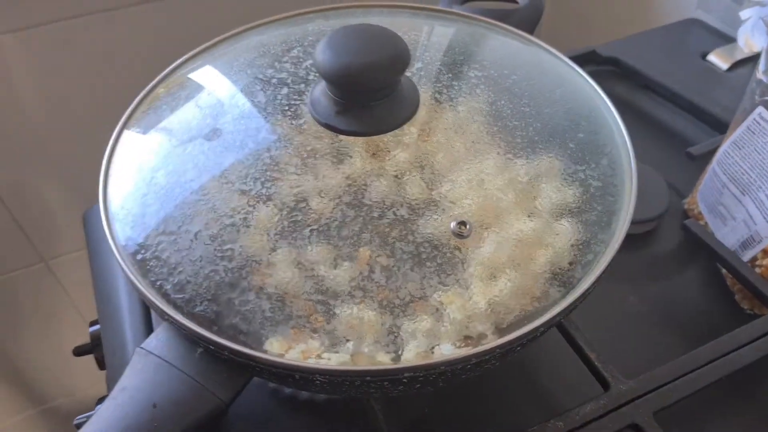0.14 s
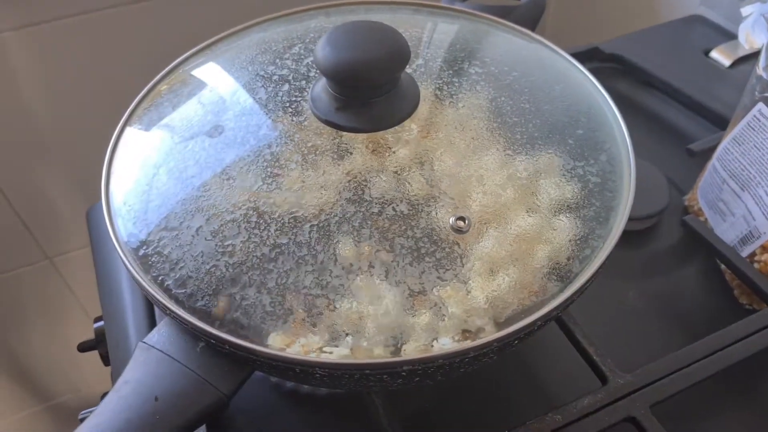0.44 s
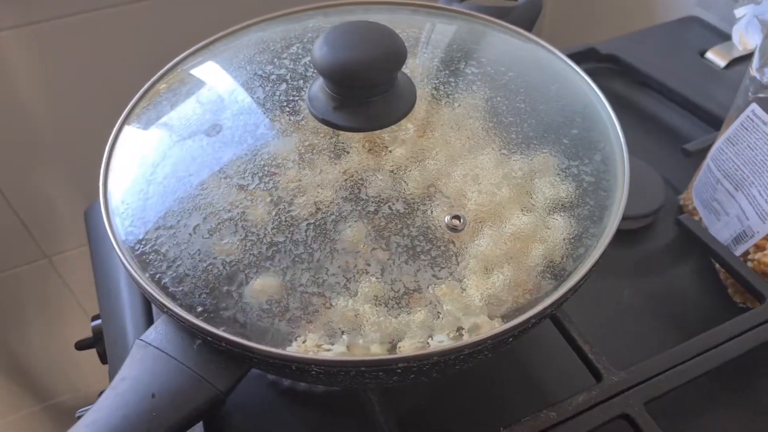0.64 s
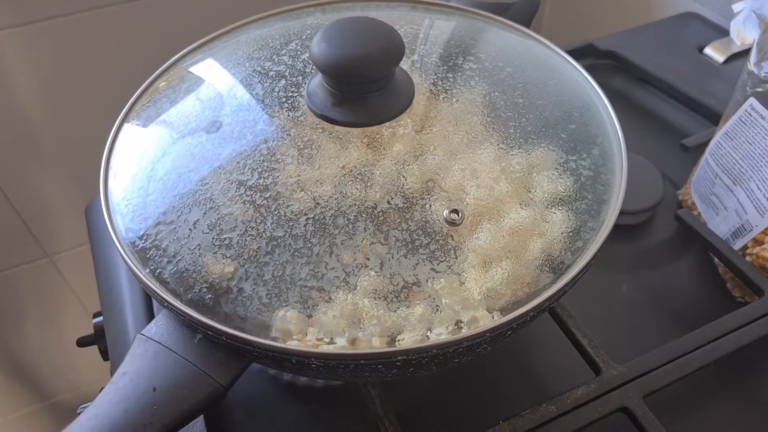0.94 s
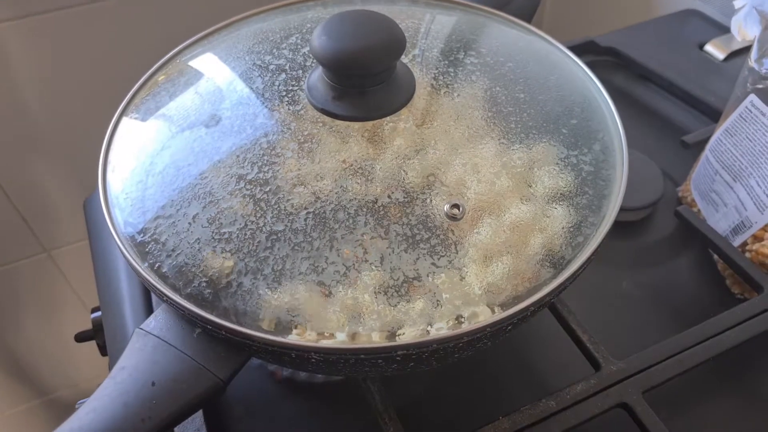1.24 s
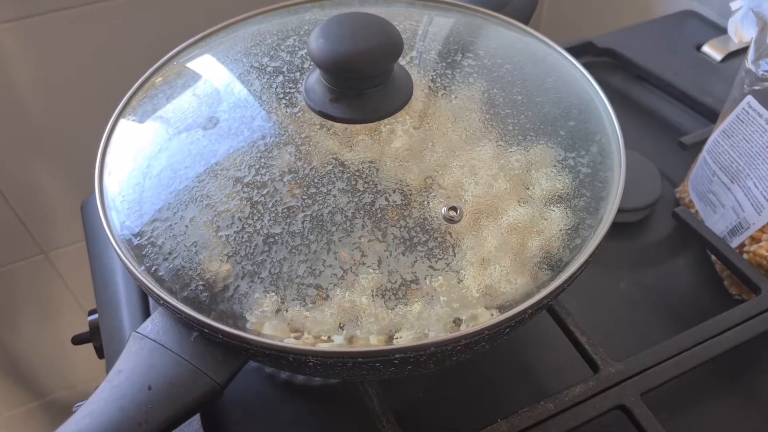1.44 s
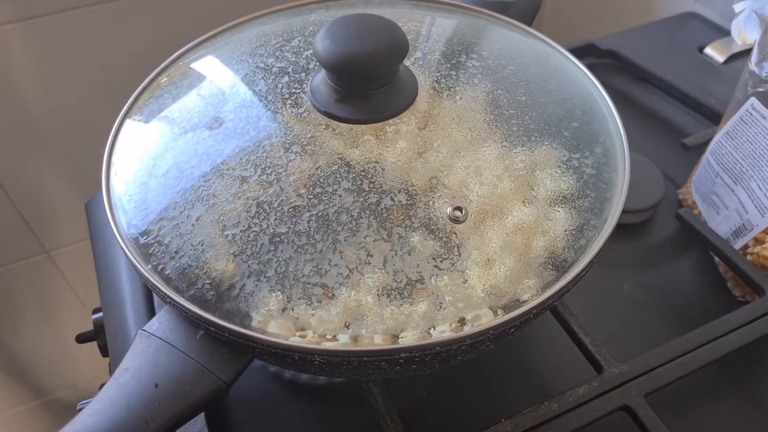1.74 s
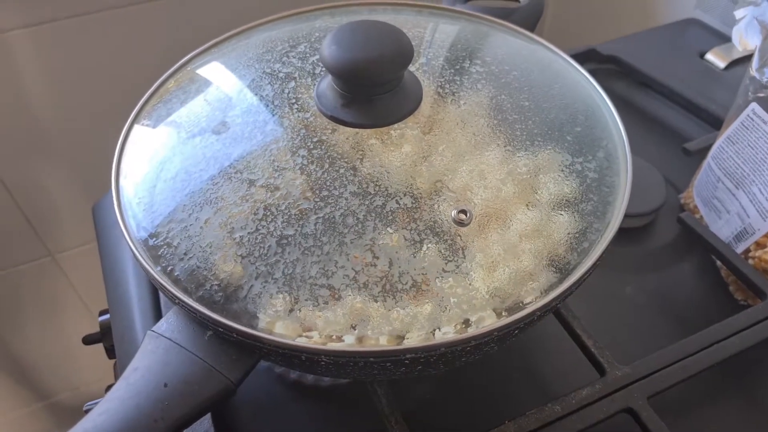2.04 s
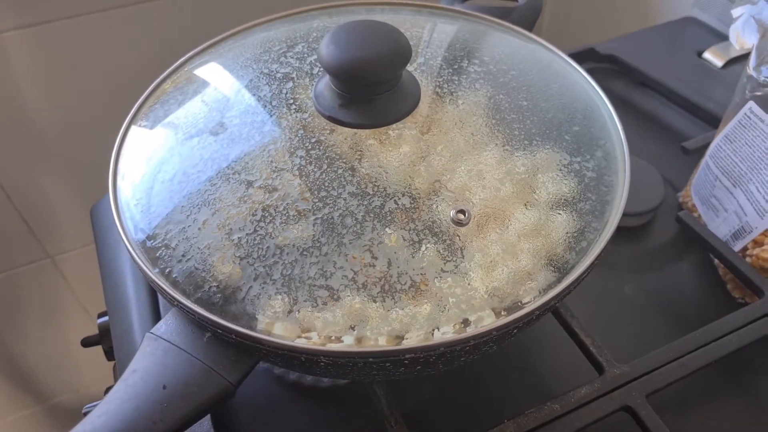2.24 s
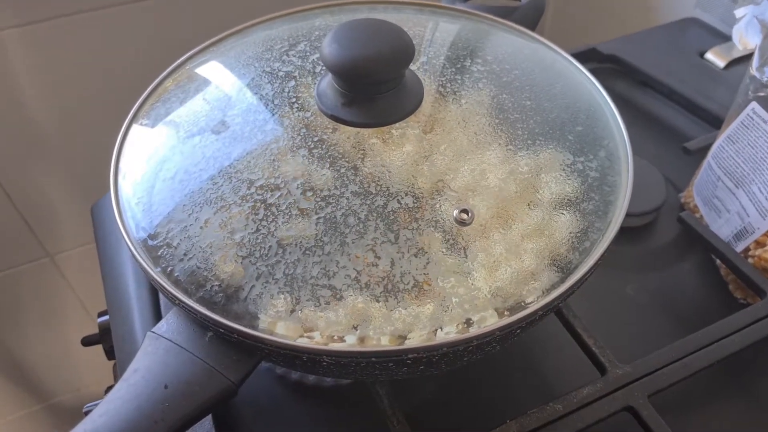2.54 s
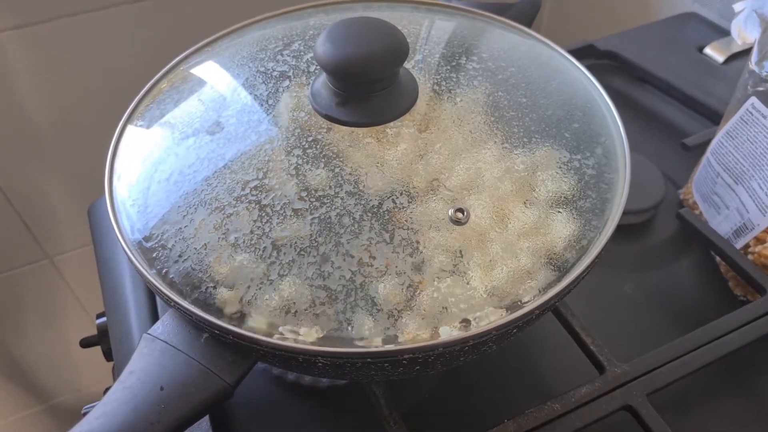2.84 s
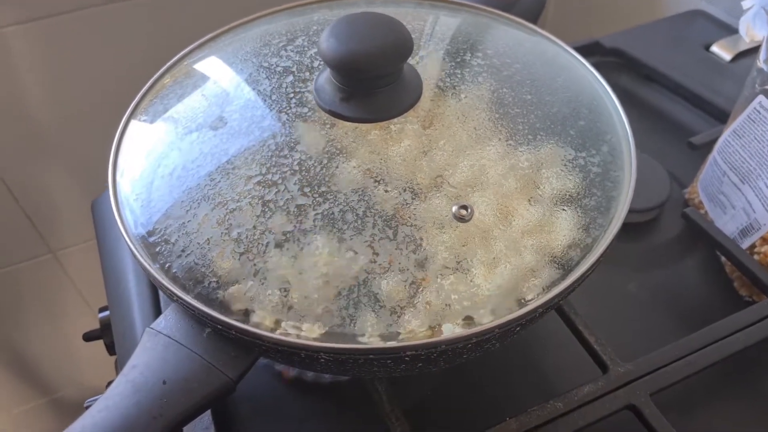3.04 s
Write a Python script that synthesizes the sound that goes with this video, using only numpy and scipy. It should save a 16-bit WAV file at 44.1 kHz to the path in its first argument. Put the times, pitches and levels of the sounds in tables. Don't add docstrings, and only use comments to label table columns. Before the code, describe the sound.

Popcorn bursts in a covered pan, close, in a small lively kitchen. A pop's ring is fading at the start; sharp cracks follow at 0.2, 0.3 (loudest), 0.6, 0.7 and 1.0 seconds, a tight cluster near 1.3, a pair near 1.77. After a lull with faint ticks, pops resume from 2.35, quickening to 2.9. Flakes tap pan and lid over steady soft gas hiss and low hum.

```python
import sys
import numpy as np
from scipy import signal
from scipy.fft import rfft, irfft
from scipy.io import wavfile

SR = 44100
rng = np.random.default_rng(int(sys.argv[2]) if len(sys.argv) > 2 else 0)


def master(y):
    cut = np.clip(np.atleast_2d(y).T, -1, 1)
    pcm = np.round(cut * 32767)
    wavfile.write(sys.argv[1], SR, pcm.astype(np.int16))


def convert_level_to_amplitude(level_db):
    exponent = np.asarray(level_db, float) / 20
    return 10 ** exponent


N = 141120
RUN_IN = SR // 5

# [f/Hz, level/dB per Hz]
FLAME = [(900, -1.5), (1500, -5.5), (2600, -12), (4200, -13.5), (6500, -9), (8300, -4), (9400, -17),
         (15500, -6.5)]
FLAME_DB = -54
# [f/Hz, level/dB per Hz]
RUMBLE = [(32, -9), (50, 0), (75, -5), (100, -1.5), (170, -21.5), (220, -8), (450, -25.5), (900, -19)]
RUMBLE_DB = -53
# [f/Hz, width/Hz, level/dB]
JETS = [(3406, 220, -60.5), (7840, 670, -56), (1244, 84, -66), (4980, 300, -60.5), (5940, 1160, -57.5)]

# [t/s, peak level/dB, thump/dB re peak, ring/dB re peak, spit length/ms]
EARLIER_BURST = [
    (-0.081, -11.5, -42, -13, 11.6),
]
# [t/s, peak level/dB, thump on stand/dB re peak, ring of pan and lid/dB re peak, spit length/ms]
BURSTS = [(0.2252, -21, -15, -18.5, 4.3), (0.3164, -5.5, -35, -19, 3.1), (0.5764, -8, -25.5, -18, 3.6),
          (0.6937, -14, -20.5, -17.5, 2.75), (0.9945, -11, -23, -19.5, 3.9), (1.2560, -13.5, -26.5, -12, 7),
          (1.2712, -11.5, -40, -19, 1.4), (1.2972, -16.5, -20.5, -12, 2.2), (1.3005, -9.5, -28.5, -19, 2.3),
          (1.7554, -15, -17.5, -17, 2.5), (1.7867, -17, -16.5, -13.5, 4.7), (2.3449, -13, -31, -14.5, 6),
          (2.4896, -10.5, -32.5, -17.5, 1.5), (2.5897, -15, -18, -8, 4.8), (2.7582, -17.5, -47, -14.5, 2.4),
          (2.7666, -17.5, -24.5, -19.5, 4.6), (2.8549, -10.5, -20, -13, 3.9),
          (2.8726, -13, -26.5, -11.5, 5.5), (3.1964, -22.5, 8, 5.5, 4.4)]
# [t/s, peak level/dB, thump/dB re peak, hollow knock/dB re peak, ring/dB re peak]
FALLS = [(0.235, -23, -38, -43, -40), (0.267, -26, -28, -43, -24), (0.353, -25.5, -10.5, -9.5, -4),
         (0.368, -36, -15, -14, -9), (0.54, -32, -37, -32, -36), (0.609, -29.5, -35, -8, 1),
         (0.674, -30, -11, -4.5, -2), (0.835, -28, -29, -24, -17.5), (0.864, -30, -23, -22, -19),
         (1.047, -27, -23.5, -18, -14.5), (1.265, -19.5, -20, -20.5, -5.5), (1.314, -40, -21, 2, -38),
         (1.659, -33.5, -38, -16, -18), (1.792, -33, -11, -8, -33), (1.909, -38, -22, -9, -11.5),
         (1.954, -42.5, -24, -10, -6.5), (2.084, -40, -29, -7.5, -12.5), (2.107, -44, -25, -7, -12),
         (2.596, -25, -15, -46, -41), (2.627, -38.5, -13, -17, 7), (2.9, -29, -15, -25, -25),
         (2.95, -38, -13, -10, -19)]
FALL_MS, RISE_MS, RATTLE_MS = 2.5, 1, 23.8
# [f/Hz, level/dB per Hz]
STEAM = [(150, -23.5), (600, -12.5), (1400, -19.5), (3000, -11), (4700, -8), (6300, 7.5), (9600, -10),
         (14500, -9)]
STEAM_DB, CRACKLE_DB = -3, 0
CREAK_DB, CREAK_MS = -13.5, 3.5
SIGH_DB, SIGH_MS = -21, 11.3
# [f/Hz, level/dB, t60/s]
STAND = [(65.5, -3, 0.11), (94.5, 6.5, 0.035), (132, 2, 0.24), (203, -7.5, 0.18)]
STAND_DB, STAND_CUT_HZ = 11, 37
# [f/Hz, level/dB, t60/s]
HOLLOW = [(227, -5, 0.11), (323, -5.5, 0.051), (402, -2.5, 0.031), (530, -4, 0.061), (586, 0, 0.025),
          (759, -8.5, 0.087), (983, -4.5, 0.08), (1103, -0.5, 0.036)]
HOLLOW_DB, KNOCK_RE_THUMP_DB = -1, -0.5
# [f/Hz, level/dB, t60/s]
PAN = [(1617, -2.5, 0.075), (1926, -4.5, 0.051), (2199, -6, 0.057), (2442, -6.5, 0.077), (2684, -12, 0.12),
       (2850, -14, 0.18), (3203, 4, 0.026), (3930, -3.5, 0.021), (4466, -5, 0.063), (5750, -4, 0.067),
       (5960, -16, 0.01), (6380, -7.5, 0.028), (7160, -33.5, 0.013), (7330, -5, 0.018)]
PAN_DB, STRIKE_SPREAD_DB, RATTLE_GRAIN_DB = -3, 2.5, 4.5
# [f/Hz, level/dB, t60/s]
LID = [(1302, -19, 0.038), (1694, -5.5, 0.067), (1840, -14.5, 0.018), (2028, -8, 0.021), (2275, -15, 0.029),
       (2625, -9, .04), (2777, -5.5, 0.053), (3176, -11, 0.021), (3360, -8, 0.062), (4240, -20.5, 0.01)]
# [f/Hz, level/dB, t60/s]
RIM = [(5868, -29.5, 0.019), (6285, -29, 0.014), (6975, -32.5, 0.012), (7500, -32.5, 0.012)]
# [t/s, level/dB, pitch f/Hz,
# t60/s]
TAPS = [(0.002, -40, 2760, 0.11), (0.228, -33, 1945, 0.05), (0.256, -29, 1756, 0.081),
        (0.274, -38.5, 1775, 0.05), (0.354, -39, 142, 0.08), (0.357, -33, 330, 0.039),
        (0.369, -29.5, 990, 0.046), (0.372, -31, 382, 0.054), (0.998, -44, 257, 0.041),
        (1.050, -39, 684, 0.027), (1.304, -29.5, 1015, 0.062), (1.760, -31, 302, 0.042),
        (1.787, -30.5, 201, 0.06), (1.788, -26, 1024, 0.038), (1.790, -38, 1643, 0.12),
        (1.794, -40, 2666, 0.084), (2.430, -39, 595, 0.059), (2.494, -28.5, 304, 0.02),
        (2.498, -38, 998, 0.16), (2.588, -30, 311, 0.073), (2.591, -26.5, 132, 0.21),
        (2.591, -30, 2174, 0.05), (2.595, -24.5, 680, 0.033), (2.608, -27.5, 1633, 0.12),
        (2.610, -34, 525, 0.18), (2.625, -36, 2700, 0.091), (2.663, -32.5, 673, 0.024),
        (2.697, -29, 646, 0.028), (2.862, -30, 2730, 0.13), (2.866, -36, 1646, 0.12),
        (3.063, -41, 577, 0.058)]
TAP_MS = 0.35
# [t/s, level/dB, centre
# f/Hz, width/octaves]
TICKS = [(0.2282, -26, 5770, 0.3), (0.3187, -14, 6540, 0.93), (0.674, -29, 3000, 0.7),
         (0.8340, -36, 5741, 1.1), (0.865, -29, 6667, 0.9), (0.996, -18, 13500, 0.48),
         (1.3020, -21, 14000, 0.5), (1.7582, -23, 5950, 0.83), (1.9086, -41, 7500, 0.6),
         (1.9090, -42, 14500, 0.4), (1.9540, -38, 3519, 0.8), (2.0830, -40, 7560, 1.2),
         (2.1096, -41, 2670, 0.64), (2.3460, -20, 6900, 0.65), (2.4915, -10, 13100, 0.48),
         (2.7690, -22, 13000, 0.63), (2.8578, -17, 7560, 1.6), (2.86, -20, 13000, 0.5),
         (2.873, -19, 13000, 0.53)]
TICK_MS = 1.1

# [f/Hz, t60/s]
KITCHEN = [(100, 0.33), (500, 0.83), (1500, 0.38), (4000, 0.36), (9000, 0.23), (15000, 0.29)]
KITCHEN_DB, KITCHEN_TILT_DB, FIRST_WALL_S = -3, 1, 0.00047
BODY_TO_ROOM_DB = -4
# [f/Hz, likeness 0..1]
LIKENESS = [(60, .98), (250, .9), (700, 0.45), (2000, 0.04), (8000, 0.033)]
STEAM_ALIKE, BODY_ALIKE, HOLLOW_ALIKE = 0.48, 0.52, 0.96
RIGHT_LAG_S, BODY_LAG_S = .0004, .00032
# [f/Hz, level/dB]
MIC_COLOUR = [(3700, 0.5), (4200, 3), (4800, -3.5), (8300, -1), (9400, -1), (11000, 4)]
MIC_LOW_CUT_HZ, MIC_TOP_HZ = 40, 15950


def at_hz(points, hz):
    table = np.array(points)
    return np.interp(np.log(hz + 1e-9), np.log(table[:, 0]), table[:, 1])


def rms_one(x):
    return x / np.sqrt(np.mean(x ** 2) + 1e-20)


def drift(rate, size):
    steps = rng.standard_normal(int(size * 40 / SR) + 3)
    return np.interp(np.arange(size) * rate / SR, np.arange(len(steps)), steps)


def bands(size, low_hz, high_hz):
    edges = np.geomspace(low_hz, high_hz, int(3 * np.log2(high_hz / low_hz)) + 2)
    white = rng.standard_normal((2, 2, size))
    for k, (low, high) in enumerate(zip(edges, edges[1:])):
        band = signal.butter(2, [low, high], "band", fs=SR, output="sos")
        mid, side = signal.sosfilt(band, white[k % 2])
        hz = np.sqrt(low * high)
        alike = at_hz(LIKENESS, hz)
        yield hz, np.sqrt(1 + alike) * mid + np.sqrt(1 - alike) * side * [[1], [-1]]


def steady(spectrum, level_db, low_hz, high_hz, patchy_db):
    size = N + RUN_IN
    out = np.zeros((2, size))
    for hz, noise in bands(size, low_hz, high_hz):
        out += convert_level_to_amplitude(at_hz(spectrum, hz) + patchy_db * drift(6.8, size)) * noise
    return convert_level_to_amplitude(level_db) * rms_one(out[:, RUN_IN:])


def flame():
    return steady(FLAME, FLAME_DB, 900.0, 17500.0, patchy_db=.7)


def rumble():
    return steady(RUMBLE, RUMBLE_DB, 31.5, 835.0, patchy_db=-2.0)


def burner_jets():
    out = 0
    for hz, width_hz, db in JETS:
        r = np.exp(-np.pi * width_hz / SR)
        x = rng.standard_normal((2, N))
        for _ in range(2):
            x = signal.lfilter([1, 0, -1], [1, -2 * r * np.cos(2 * np.pi * hz / SR), r * r], x)
        out = out + convert_level_to_amplitude(db + 0.5 * drift(6.7, N)) * rms_one(x)
    return out


def ring(clicks, hz, t60):
    r = convert_level_to_amplitude(-60 / (t60 * SR))
    w = 2 * np.pi * hz / SR
    return signal.lfilter([0, np.sin(w)], [1, -2 * r * np.cos(w), r * r], clicks + 1e-18)


def coloured(x, spectrum):
    cepstrum = irfft(np.log(convert_level_to_amplitude(at_hz(spectrum, np.arange(2049) * SR / 4096))))
    cepstrum[1:2048] *= 2
    cepstrum[2049:] = 0
    response = irfft(np.exp(rfft(cepstrum)))[:2048]
    return signal.fftconvolve(x, response)[:len(x)]


def grainy(size, grain, spread_db):
    return convert_level_to_amplitude(spread_db * np.repeat(rng.standard_normal(size // grain), grain))


def contacts():
    rows = []
    for s, db, thump, clang, ms in list(EARLIER_BURST) + list(BURSTS):
        rows.append((int(s * SR) + RUN_IN, db, thump, thump + KNOCK_RE_THUMP_DB, clang, ms))
    for s, db, thump, knock, clang in FALLS:
        rows.append((int(s * SR) + RUN_IN, db, thump, knock, clang, FALL_MS))
    return rows


def steam_spit(near, other, shape, ms, lead):
    ports = np.array([near, STEAM_ALIKE * near + np.sqrt(1 - STEAM_ALIKE ** 2) * other])
    crackle = rms_one(ports * grainy(len(ms), 21, CRACKLE_DB))
    creak_and_sigh = convert_level_to_amplitude(CREAK_DB) * np.exp(-np.abs(ms - ms[lead]) / CREAK_MS)
    creak_and_sigh[lead:] += convert_level_to_amplitude(SIGH_DB) * np.exp(-ms[:-lead] / SIGH_MS)
    return convert_level_to_amplitude(STEAM_DB) * crackle * (np.roll(shape, lead) / shape.max() + creak_and_sigh)


def lid_rattle(near, other, ms):
    ports = np.array([other, BODY_ALIKE * other + np.sqrt(1 - BODY_ALIKE ** 2) * near])
    chatter = ports * grainy(len(ms), 63, RATTLE_GRAIN_DB) * np.exp(-ms / RATTLE_MS)
    return rms_one(chatter) / np.sqrt(len(ms))


def popping():
    size, span, lead = N + 2 * RUN_IN, SR // 10, SR // 50
    modes = STAND + HOLLOW + PAN + LID
    ms = np.arange(span) * 1000 / SR
    spit, shakes = np.zeros((2, size)), np.zeros((len(modes), 2, size))
    for i, db, thump_db, knock_db, ring_db, length_ms in contacts():
        shape = (1 - np.exp(-ms / RISE_MS)) ** 2 * np.exp(-ms / length_ms)
        near, other = rng.standard_normal((2, span))
        spit[:, i - lead:i - lead + span] += convert_level_to_amplitude(db) * steam_spit(near, other, shape, ms, lead)
        rattle = lid_rattle(near, other, ms)
        thump = convert_level_to_amplitude(thump_db + STAND_DB) * np.array([shape, shape]) / shape.sum()
        knock = convert_level_to_amplitude(knock_db + HOLLOW_DB) * (HOLLOW_ALIKE * rattle[0] + (1 - HOLLOW_ALIKE) * rattle)
        clang = convert_level_to_amplitude(ring_db + PAN_DB) * rattle
        drive = np.array([thump] * len(STAND) + [knock] * len(HOLLOW) + [clang] * len(PAN + LID))
        strength_db = db + STRIKE_SPREAD_DB * rng.standard_normal((len(modes), 1, 1))
        shakes[:, :, i:i + span] += convert_level_to_amplitude(strength_db) * drive
    rings = sum((-1) ** k * convert_level_to_amplitude(db) * ring(shakes[k], hz, t60) for k, (hz, db, t60) in enumerate(modes))
    rim = sum(convert_level_to_amplitude(db) * ring(spit, hz, t60) for hz, db, t60 in RIM)
    low_cut = signal.butter(2, STAND_CUT_HZ, "high", fs=SR, output="sos")
    steam = np.array([coloured(side, STEAM) for side in spit])
    return steam + rim, signal.sosfilt(low_cut, rings)


def taps():
    out = np.zeros(N + 2 * RUN_IN)
    t = np.arange(SR // 4) / SR
    for s, db, hz, t60 in TAPS:
        neighbour = np.sin(2 * np.pi * 1.09 * hz * t + rng.uniform(0, 6))
        tone = np.sin(2 * np.pi * hz * t) + .5 * neighbour
        i = int(s * SR) + RUN_IN
        out[i:i + len(t)] += convert_level_to_amplitude(db - 60 * t / t60) * (1 - np.exp(-1000 * t / TAP_MS)) * tone
    return out


def kitchen(x):
    s = np.arange(SR // 2) / SR
    tail = np.zeros((2, len(s)))
    for hz, noise in bands(len(s), 76.1, 21100.0):
        tail += convert_level_to_amplitude(KITCHEN_TILT_DB * np.log2(hz / 4000) - 60 * s / at_hz(KITCHEN, hz)) * noise
    tail *= 1 - np.exp(-s / FIRST_WALL_S)
    tail /= np.sqrt(np.sum(tail ** 2) / 2)
    return convert_level_to_amplitude(KITCHEN_DB) * signal.fftconvolve(x[None], tail, axes=1)[:, :len(x)]


def ticks():
    out = np.zeros((2, N + SR // 10))
    ms = np.arange(SR // 20) * 1000 / SR
    for s, db, hz, octaves in TICKS:
        near, other = rng.standard_normal((2, len(ms))) * np.exp(-ms / TICK_MS)
        far = np.roll(.8 * near + .6 * other, int(RIGHT_LAG_S * SR))
        edges = np.clip(hz * 2 ** (np.array([-.5, .5]) * octaves), 100, 16000)
        burst = signal.sosfilt(signal.butter(2, edges, "band", fs=SR, output="sos"), [near, far])
        i = int(s * SR)
        out[:, i:i + len(ms)] += convert_level_to_amplitude(db) * burst / np.abs(burst).max()
    return out[:, :N]


def scene():
    floor = flame() + rumble() + burner_jets()
    spit, rings = popping()
    body = rings + taps()
    left = spit[0] + body[0]
    right = np.roll(spit[1], int(round(RIGHT_LAG_S * SR))) + np.roll(body[1], int(BODY_LAG_S * SR))
    right = coloured(right, [(9000, -0.54), (15000, 5.0)])
    room = kitchen(spit[0] + convert_level_to_amplitude(BODY_TO_ROOM_DB) * body[0])
    pan = np.array([left, right]) + room
    return pan[:, RUN_IN:RUN_IN + N] + floor + ticks()


def top_cut(x):
    return signal.sosfilt(signal.butter(12, 16850, fs=SR, output="sos"), x)


def record(dry):
    x = np.array([coloured(side, MIC_COLOUR) for side in dry])
    x = signal.sosfilt(signal.butter(4, MIC_LOW_CUT_HZ, "high", fs=SR, output="sos"), x)
    x = signal.sosfilt(signal.cheby2(16, 26, MIC_TOP_HZ, fs=SR, output="sos"), x)
    return top_cut(x)


dry = scene()
out = record(dry)
master(out)
```